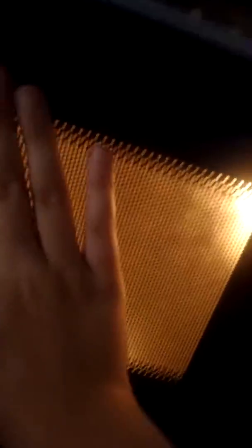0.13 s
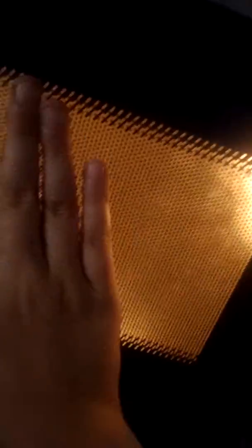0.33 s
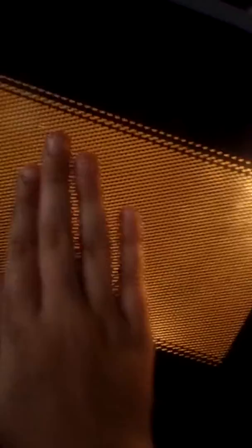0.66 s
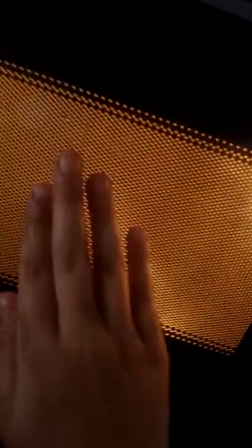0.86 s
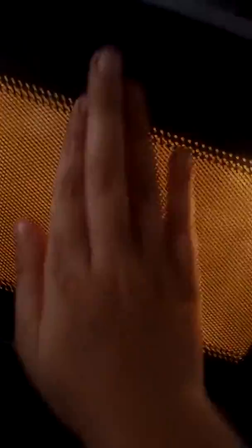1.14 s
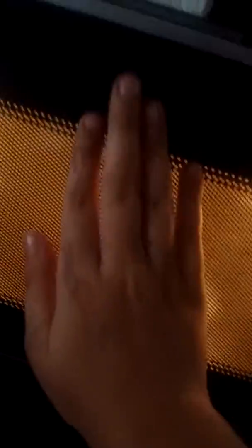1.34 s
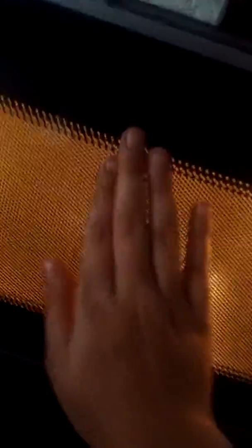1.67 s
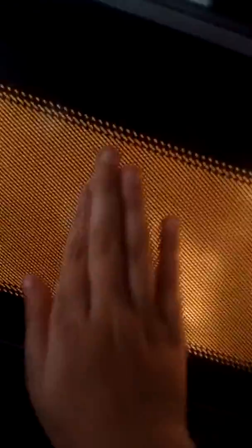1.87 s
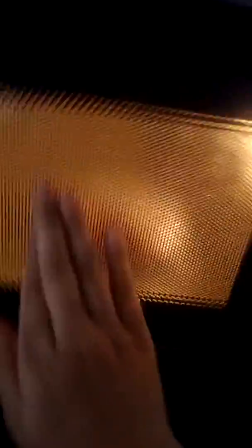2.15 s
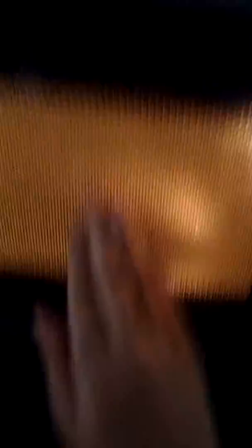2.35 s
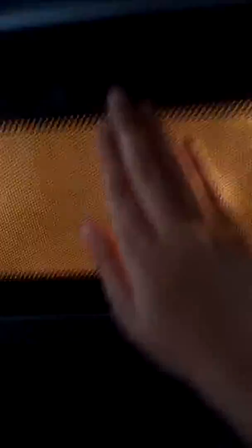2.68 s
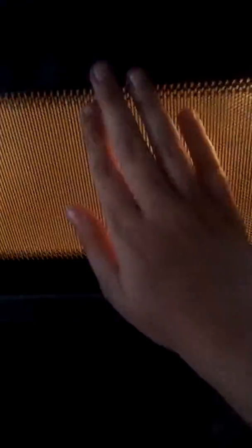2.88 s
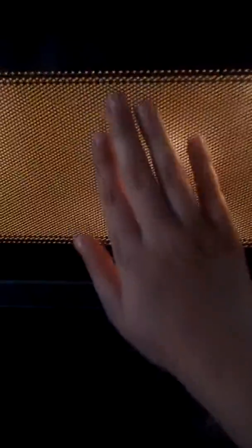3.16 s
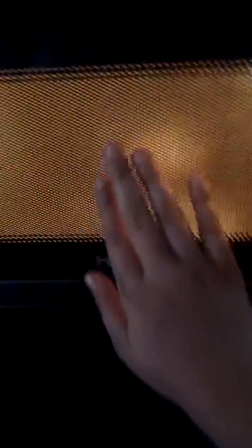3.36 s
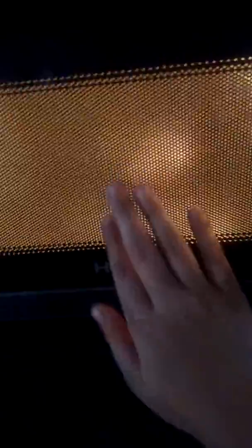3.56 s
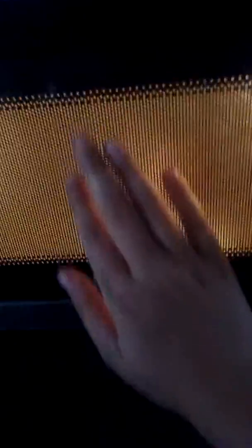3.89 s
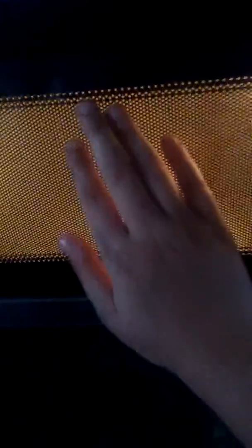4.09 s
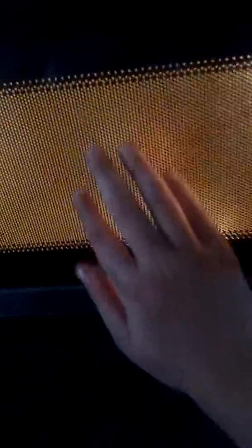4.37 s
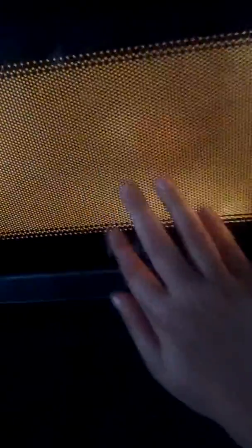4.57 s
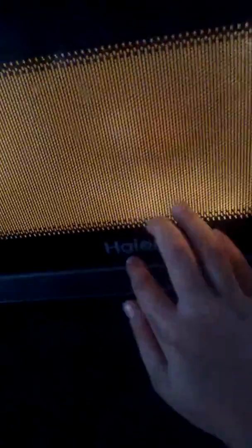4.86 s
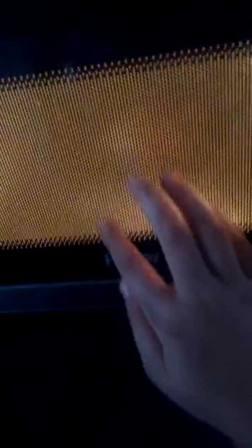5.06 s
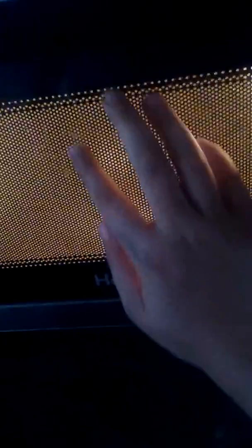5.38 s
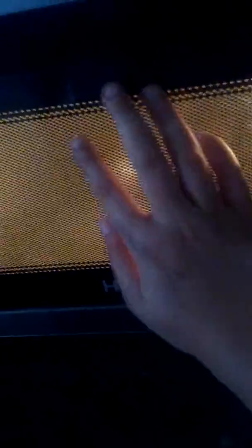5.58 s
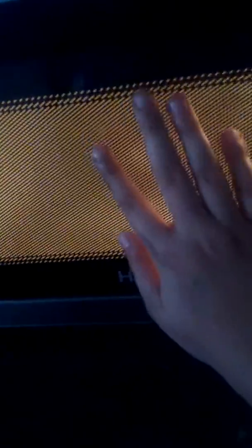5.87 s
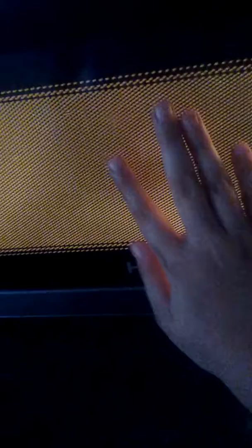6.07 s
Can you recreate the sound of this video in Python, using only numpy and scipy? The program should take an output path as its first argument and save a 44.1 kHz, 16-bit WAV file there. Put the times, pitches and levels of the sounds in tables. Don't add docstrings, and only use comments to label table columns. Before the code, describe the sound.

Steady low mains hum and airy fan rush of a running microwave, with a few dry handling taps and clicks near the middle.

```python
import sys
import numpy as np
from scipy import signal
from scipy.fft import rfft, irfft, next_fast_len
from scipy.io import wavfile
from scipy.ndimage import uniform_filter1d, map_coordinates

SR = 44100
rng = np.random.default_rng(int(sys.argv[2]) if len(sys.argv) > 2 else 0)


def persist_wave(psi):
    counts = np.round(np.clip(psi, -1, 1) * 32767).astype(np.int16)
    wavfile.write(sys.argv[1], SR, np.atleast_2d(counts).T)


def level_to_linear(level):
    exponent = np.asarray(level, float) / 20
    return 10 ** exponent


N = 274743
TIME = np.arange(N) / SR


def unit(x):
    return x / np.sqrt(np.mean(x ** 2) + 1e-20)


def wobble(rate):
    knots = rng.standard_normal(int(N * rate / SR) + 4)
    return map_coordinates(knots, [np.arange(N) * rate / SR])


def filtered(x, response):
    m = next_fast_len(N + SR // 2)
    return irfft(rfft(x, m) * response(np.fft.rfftfreq(m, 1 / SR)), m)[..., :N]


def rush(spectrum, patchy_db):
    z = signal.stft(rng.standard_normal(N), nperseg=512)[2]
    patches = uniform_filter1d(rng.standard_normal(z.shape), size=5, axis=0)
    patches = uniform_filter1d(patches, size=12, axis=1)
    noise = unit(signal.istft(z * level_to_linear(patchy_db * unit(patches)), nperseg=512)[1][:N])
    f, db = np.transpose(spectrum)
    return filtered(noise, lambda hz: np.sqrt(SR / 2) * level_to_linear(np.interp(np.log(hz + 1), np.log(f), db)))


def tone(turns, sway_db):
    return np.sqrt(2) * level_to_linear(sway_db * wobble(4.82)) * np.sin(2 * np.pi * (turns + rng.random()))


MAINS_ORDERS = [1, 2, 3, 4, 5, 6, 8, 14, 22, 28, 32, 55, 71, 79]
# level on both ports in dB, level between ports in dB.
CORE = [(-38, -85), (-17.5, -72), (-38.5, -75), (-38.5, -74), (-41, -68), (-45, -66), (-57, -75),
        (-60, -87), (-55, -65.5), (-72, -70), (-70, -67.5), (-63, -69), (-84, -74), (-88, -79)]


def transformer(mains):
    return sum(level_to_linear(db)[:, None] * tone(order * mains, sway_db=0.3 + 0.071 * order)
               for order, db in zip(MAINS_ORDERS, np.array(CORE)))


SHAFT_ORDERS = [.5, 1, 2, 3, 4, 8, 12, 16, 24]
# level on both ports in dB, level between ports in dB.
SHAFT = [(-49, -93), (-39.5, -86), (-53, -89), (-60, -85), (-34.5, -66), (-43, -69.5), (-44.5, -60.5),
         (-53, -67.5), (-72, -64)]


def fan_motor(shaft):
    return sum(level_to_linear(db)[:, None] * tone(order * shaft, sway_db=0.21 * order)
               for order, db in zip(SHAFT_ORDERS, np.array(SHAFT)))


BEAT_ORDERS = [-1, 1, 2, 3, 4]
BEATS_DB = [-51.5, -39, -68, -61, -43]


def beats(mains, shaft):
    return sum(level_to_linear(db) * tone(2 * mains + order * shaft, sway_db=2.5)
               for order, db in zip(BEAT_ORDERS, BEATS_DB))


def hum():
    mains_hz, fan_hz = 59.99, 46.59
    mains = mains_hz * TIME
    shaft = np.cumsum(fan_hz * (1 + 0.0012 * wobble(1.992))) / SR
    return transformer(mains) + fan_motor(shaft) + [[1], [0]] * beats(mains, shaft)


# frequency in Hz, density in dB per Hz.
RUMBLE = [(15, -100), (30, -72), (60, -96), (95, -80), (150, -53.5), (190, -55), (240, -51.5), (340, -59),
          (400, -60.5), (510, -62), (640, -71.5), (750, -69), (930, -65), (1050, -107.5)]
# frequency in Hz, density in dB per Hz.
AIR = [(500, -110), (1000, -66.5), (1250, -74.5), (1500, -69.5), (2150, -76.5), (2300, -78.5),
       (3300, -73.5), (4000, -84.5), (5500, -95.5), (6400, -94.5), (9000, -103), (11000, -107),
       (14000, -108), (15200, -114)]
# frequency in Hz, density in dB per Hz.
ACROSS = [(60, -100), (300, -86.5), (430, -85.5), (560, -75), (640, -80), (960, -74.5), (1120, -75),
          (1290, -83.5), (1400, -78.5), (1700, -77), (2150, -81), (2300, -79), (2750, -77.5), (3800, -110)]
# frequency in Hz, density in dB per Hz.
ACROSS_HISS = [(2000, -110), (3100, -84.5), (3900, -86.5), (4800, -87), (5500, -92.5), (8000, -99),
               (10200, -105), (12500, -108), (13200, -110), (13900, -136), (14600, -109), (15500, -110)]


def fan_air():
    both = rush(RUMBLE, patchy_db=2.5) + rush(AIR, patchy_db=-1.1)
    between = rush(ACROSS, patchy_db=1.0) + rush(ACROSS_HISS, patchy_db=1.56)
    return np.array([both, between])


# frequency in Hz, density in dB per Hz.
VENT = [(150, -25), (280, 2), (470, 1), (750, -33)]


def vent_drone():
    return unit(rush(VENT, patchy_db=4.0))


def behind(hz):
    delay_s, cavity_hz, cavity_span_hz, cavity_turns = 1 / 3160, 9300, 2200, 0.665
    cavity = 1 - np.exp(-np.clip(hz - cavity_hz, 0, None) / cavity_span_hz)
    return np.exp(-2j * np.pi * (hz * delay_s + cavity_turns * cavity))


# frequency in Hz, share of the other port.
COPY = [(100, 0.65), (1500, 0.8), (3050, 0.22), (4850, 0.37), (6400, 0.74), (8000, 0.64), (9400, 0.53),
        (11000, 0.13), (13000, 0.15), (16000, 0.23)]


def late_copy(hz):
    share = np.clip(np.interp(hz, *np.transpose(COPY)), 0, 1)
    lean = hz / (hz + 1200) / (1 + (hz / 7000) ** 2)
    return share * level_to_linear(-2 * np.array([[1], [-1]]) * lean) * behind(hz)


def crossed(ports):
    return ports + filtered(ports[::-1], late_copy)


# frequency in Hz, density in dB per Hz.
SELF_NOISE = [(300, -125), (3000, -118), (9000, -117), (13300, -114), (13950, -132), (14500, -113),
              (15400, -116), (15700, -160)]


def self_noise():
    return crossed(np.array([rush(SELF_NOISE, patchy_db=.6), rush(SELF_NOISE, patchy_db=.6)]))


def ring(contacts):
    out = np.zeros(N)
    for s, db, hz, t60, sign in contacts:
        age = np.clip(TIME - s, 0, None)
        out += np.sign(sign) * level_to_linear(db - 60 * age / t60) * np.sin(2 * np.pi * hz * age)
    return out


# start in seconds, peak in dB, ring in Hz, t60 in seconds, sign of the first swing.
TAPS = [
    (1.5651, -15, 7400, 0.00069, 1),
    (2.0817, -10, 3120, 0.0023, 1),
    (2.3874, -11, 3020, 0.006, 1),
    (2.3033, -15, 760, 0.0098, 1),
    (2.407, -23, 1500, 0.0026, 1),
    (2.457, -14, 750, 0.0056, 1),
    (4.0103, -6, 1030, 0.0023, 1),
]


def taps():
    return ring(TAPS)


def pressure(strokes):
    edge_db, grip_s, lift_s, lift_share = 28, 0.003, 0.008, 0.5
    total = 0
    for s, length, first_db, last_db in strokes:
        slide_db = np.interp(TIME, [s, s + length], [first_db, last_db])
        before = (s - TIME) / grip_s
        after = (TIME - s - length) / (lift_s + lift_share * length)
        total = total + level_to_linear(slide_db - edge_db * np.clip(np.maximum(before, after), 0, 8))
    return total


# start in seconds, length in seconds, first level in dB, last level in dB.
RUBS = [
    (2.083, 0.023, -26.5, -36.5),
    (2.305, 0.027, -29.5, -32),
    (2.353, 0.038, -40, -25.5),
    (2.394, 0.13, -21, -29.5),
    (3.81, 0.11, -47, -44),
    (4.065, 0.054, -42, -41),
]
# frequency in Hz, density in dB per Hz.
SKIN = [(300, 0), (800, -5.5), (2000, 0.5), (4000, -1.5), (8000, -3), (12000, -18), (15500, -40)]


def rubs():
    return pressure(RUBS) * unit(rush(SKIN, patchy_db=2.0) * level_to_linear(1.8 * wobble(300)))


# frequency in Hz, level in dB, t60 in seconds.
KNOCK = [
    (596, 5.5, 0.0037),
    (3420, -8.5, 0.0028),
    (8700, -5.5, 0.0013),
]


def knock():
    return ring([(2.08505, db, hz, t60, -1) for hz, db, t60 in KNOCK])


DUCK_TIMES = [2.0866, 2.3897]
# gain in dB, hold in seconds, recovery in dB per second.
DUCKS = [
    (-9.5, .01, 17),
    (-20.5, 0.092, 10),
]


def gain_control():
    gain_db = np.zeros(N)
    for s, (db, hold, rate) in zip(DUCK_TIMES, DUCKS):
        ducked = np.minimum(0, db + rate * np.clip(TIME - s - hold, 0, None))
        gain_db = np.minimum(gain_db, np.where(TIME > s, ducked, 0))
    return level_to_linear(uniform_filter1d(gain_db, size=31))


# start in seconds, length in seconds, first level in dB, last level in dB.
CREAKS = [
    (2.335, 0.048, -60, -37),
    (2.404, .008, -18, -43),
]
# frequency in Hz, density in dB per Hz.
GRIP = [(120, -9), (220, 0), (400, -2), (700, -31)]


def creaks():
    return pressure(CREAKS) * unit(rush(GRIP, patchy_db=-1.5))


# frequency in Hz, level in dB, t60 in seconds.
SNAP = [
    (4300, 7, .0011),
    (1300, -9, .002),
    (2600, -5, .0015),
    (8000, 2, .001),
]


def snap():
    snap_s = 2.38856
    swings = [(0, 0, 1), (0.00072, 0, 0.92)]
    leads = [(0, 0, 1), (0.00017, -12, 1.3)]
    contacts = []
    for hz, db, t60 in SNAP:
        for late_s, late_db, lower in swings:
            for early_s, early_db, higher in leads:
                start = snap_s + late_s - early_s
                contacts.append((start, db + late_db + early_db, hz * lower * higher, t60, 1))
    return ring(contacts)


def fingers():
    touch = taps() + rubs() + knock() + snap()
    return filtered(touch, lambda hz: 1 / (1 + 1j * hz / 10500) ** 2)


def to_left(hz):
    shadow_hz, shadow_span_hz, shadow_db = 8000, 2500, -4.5
    shadow = np.exp(-((hz - shadow_hz) / shadow_span_hz) ** 2)
    return level_to_linear(-0.8 + shadow_db * shadow) * behind(hz)


# time in seconds, nearness in dB, vent drone in dB.
NEAR = [
    (0, 1, -50),
    (1.2, 0.5, -77.5),
    (2.1, -0.7, -59),
    (3.5, -1, -53),
    (4.8, -0.1, -51.5),
    (6.23, -.3, -50.5),
]


def scene():
    s, *columns = np.transpose(NEAR)
    near_db, vent_db = [np.interp(TIME, s, column) for column in columns]
    both, between = level_to_linear(near_db) * hum() + level_to_linear(0.22 + 0.75 * near_db) * fan_air()
    between = between + level_to_linear(vent_db) * vent_drone()
    oven = crossed(np.array([both + between, both - between]))
    touch, creak = fingers(), creaks()
    return oven + [filtered(touch, to_left) + creak, touch - creak]


def roll_off(x):
    return signal.sosfilt(signal.butter(12, 16660, fs=SR, output="sos"), x)


def record(dry):
    top_hz = 15500
    lean = lambda hz: (1 + np.array([[1], [-1]]) * 0.089 / (1 + 1j * hz / 400)) * (hz < top_hz)
    x = filtered(dry, lean) * gain_control()
    x = (x + self_noise()) * [[1], [-1]]
    x = x / (1 + np.abs(x) ** 16) ** (1 / 16)
    x = filtered(x, lambda hz: np.clip((17000 - hz) / 800, 0, 1) ** 2)
    return roll_off(x)


dry = scene()
out = record(dry)
persist_wave(out)
```